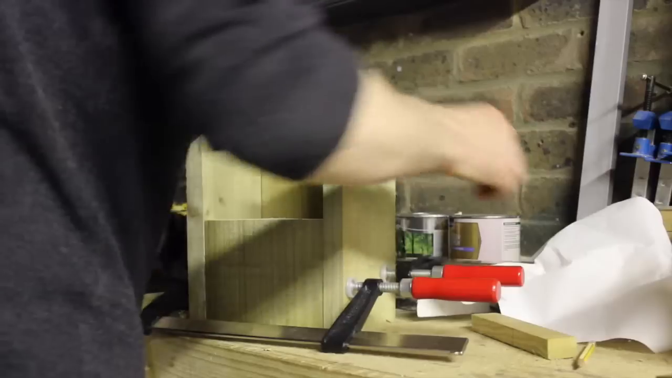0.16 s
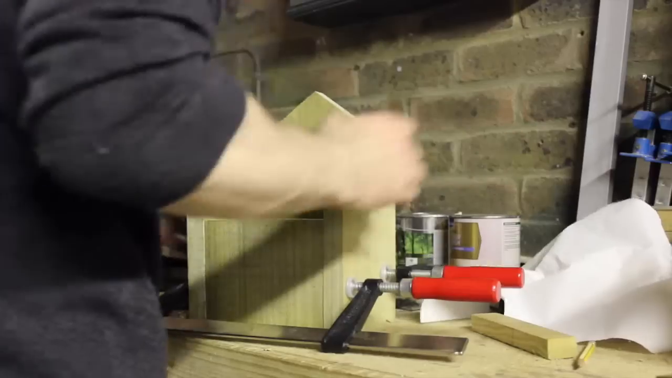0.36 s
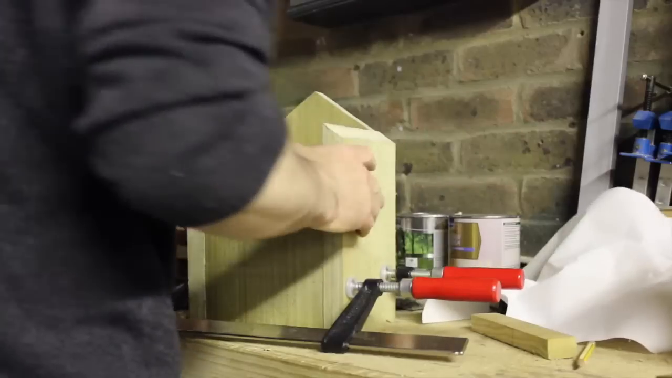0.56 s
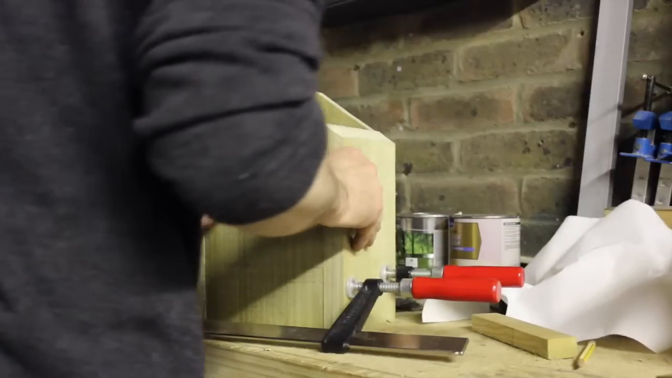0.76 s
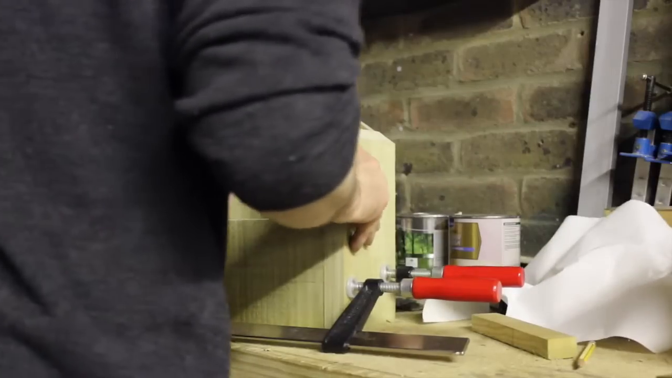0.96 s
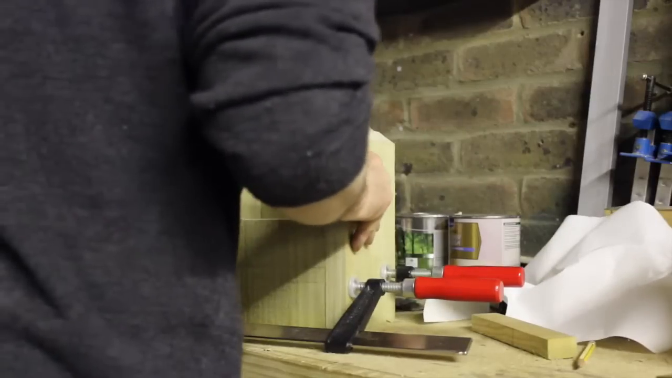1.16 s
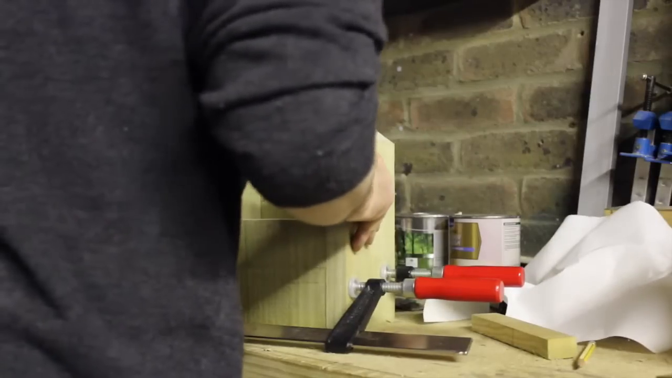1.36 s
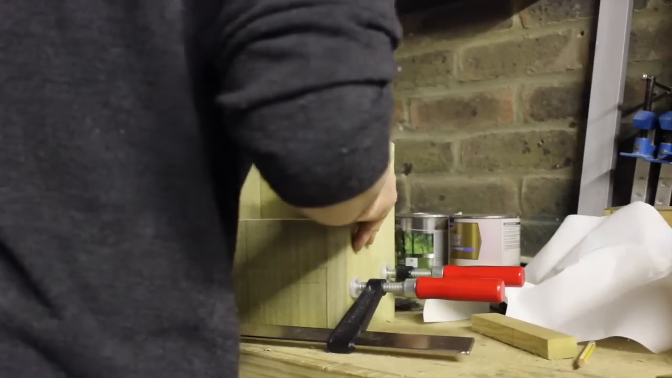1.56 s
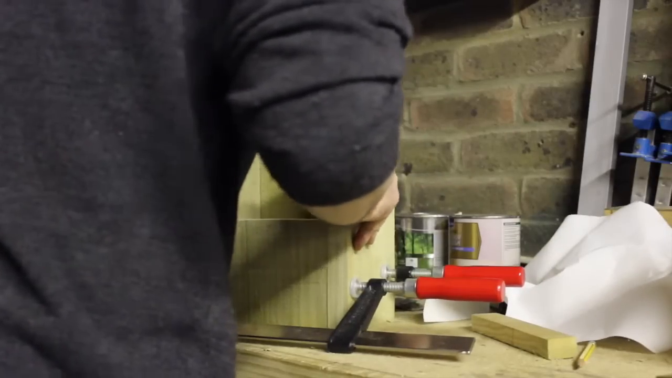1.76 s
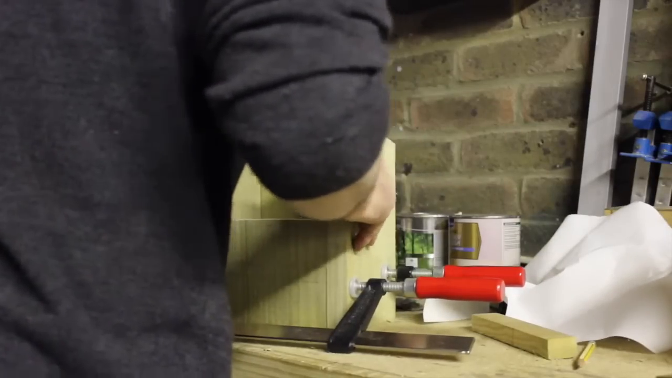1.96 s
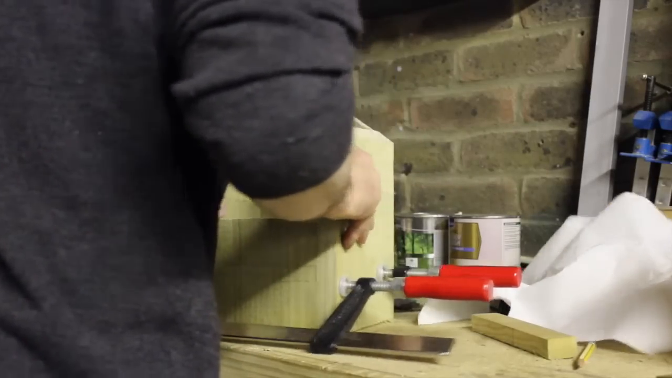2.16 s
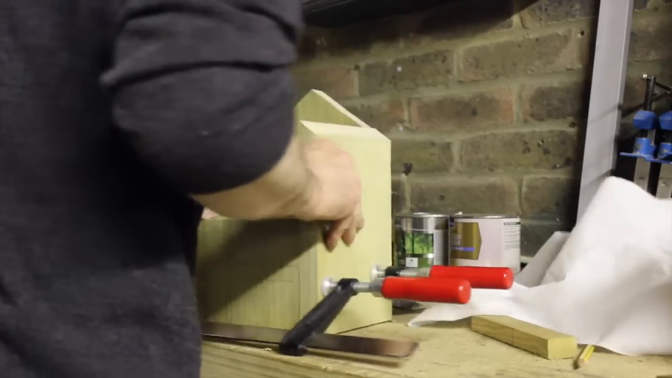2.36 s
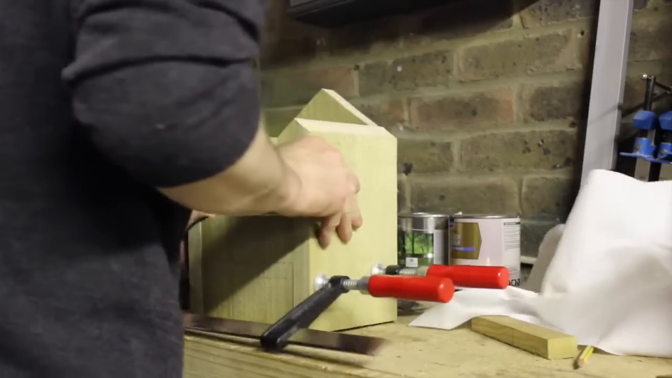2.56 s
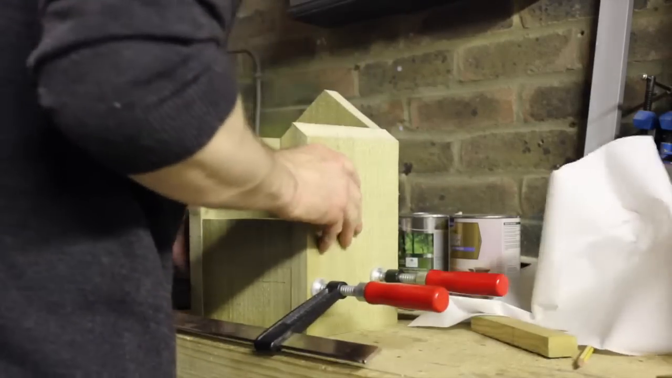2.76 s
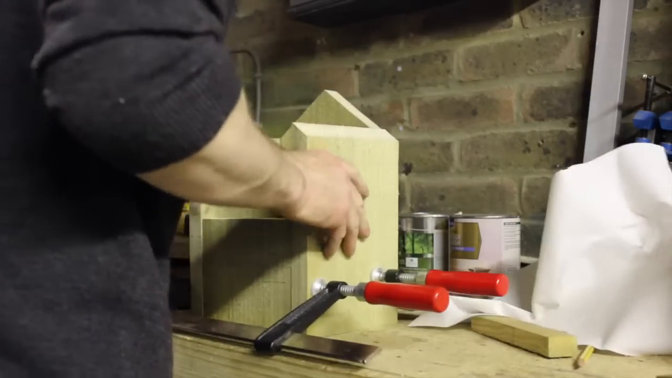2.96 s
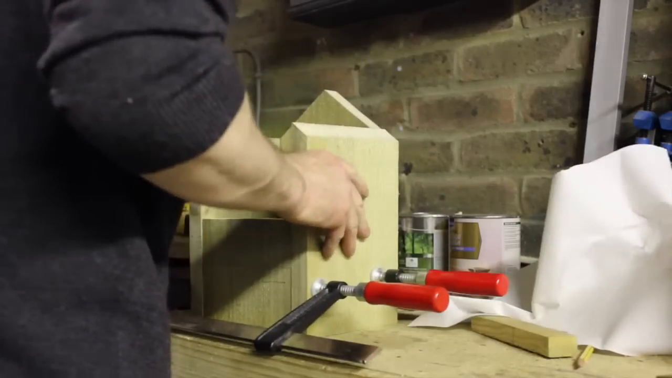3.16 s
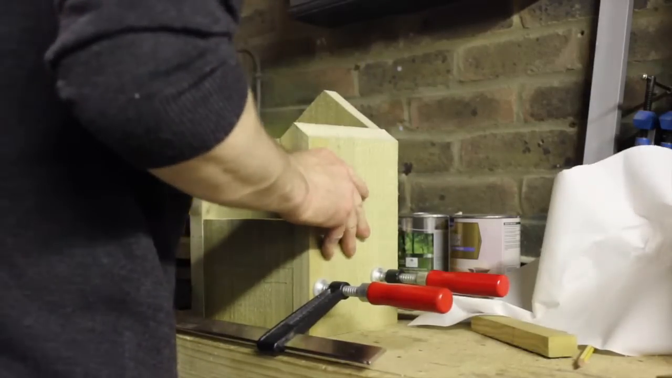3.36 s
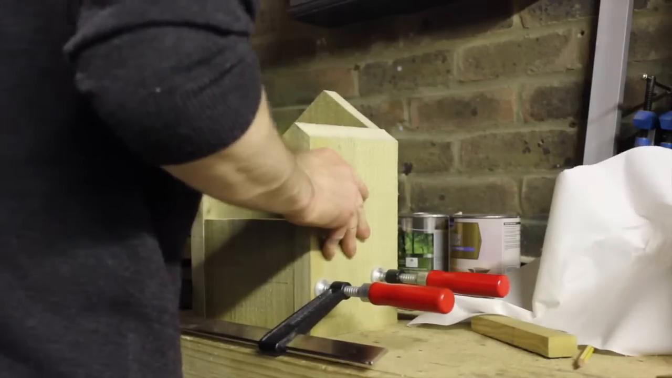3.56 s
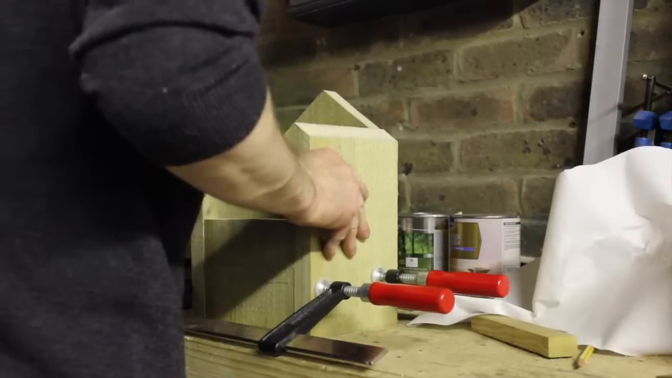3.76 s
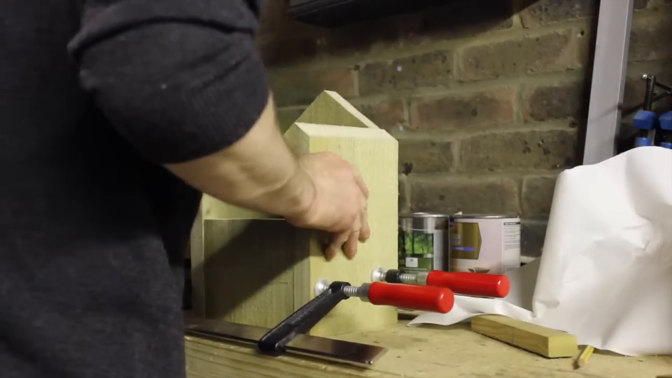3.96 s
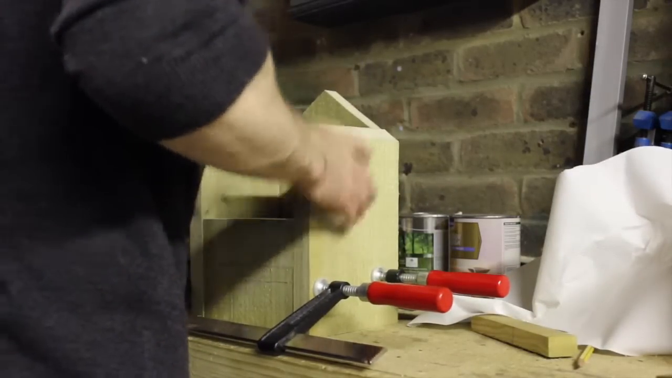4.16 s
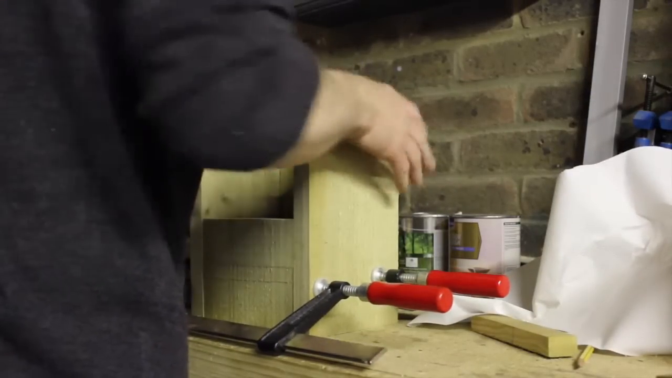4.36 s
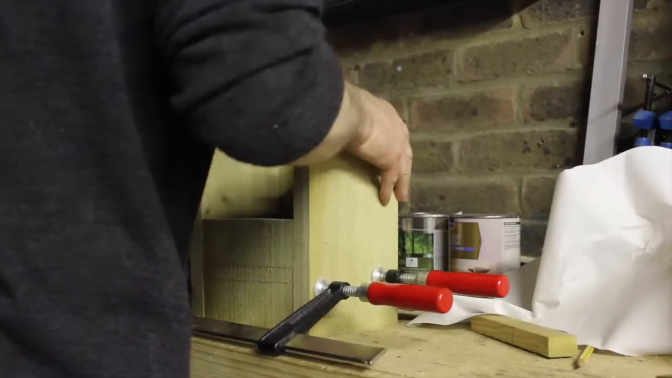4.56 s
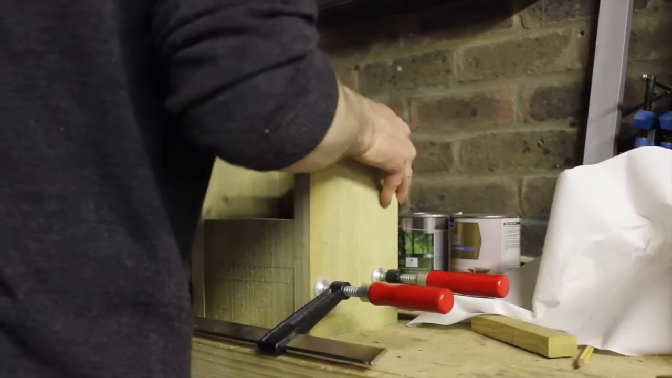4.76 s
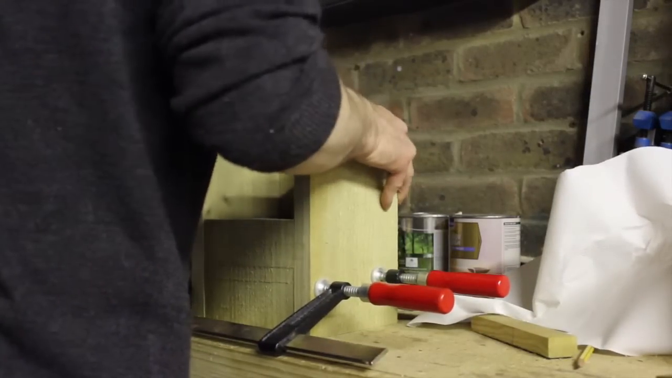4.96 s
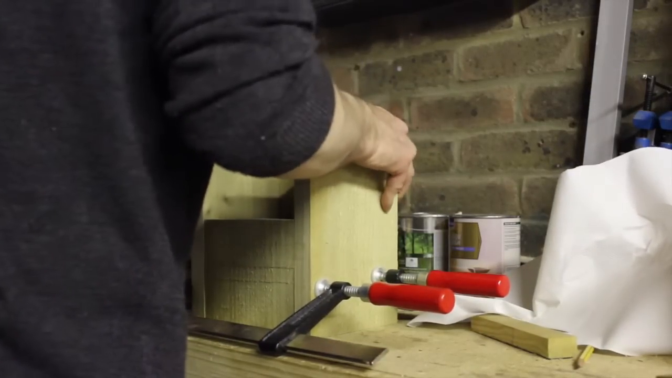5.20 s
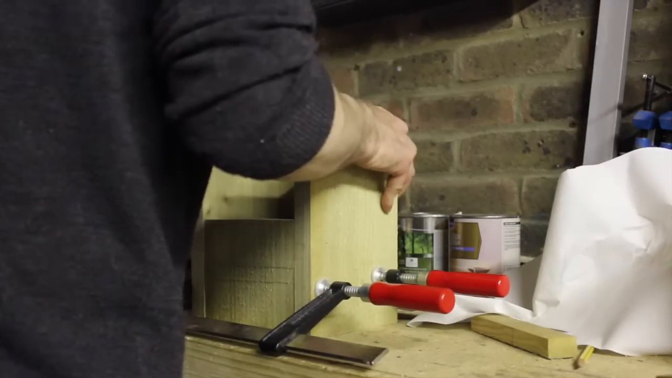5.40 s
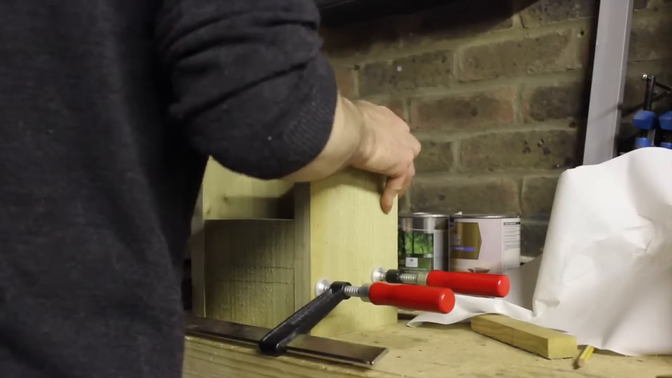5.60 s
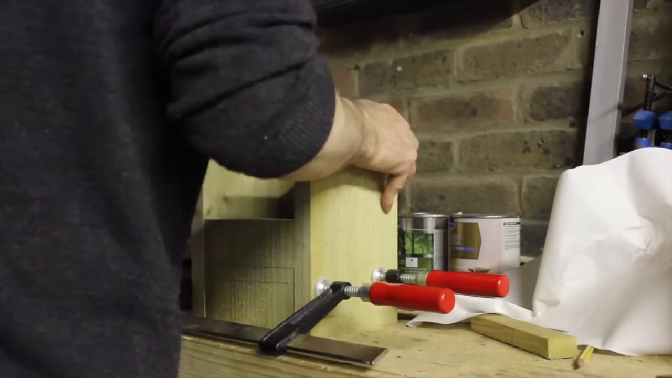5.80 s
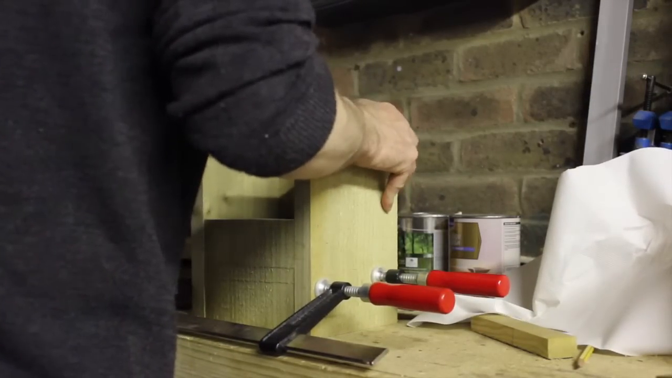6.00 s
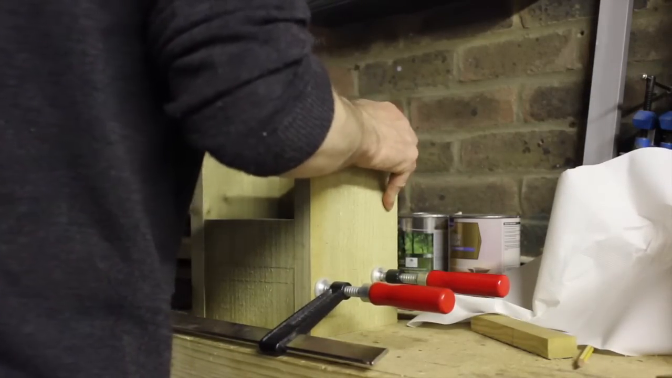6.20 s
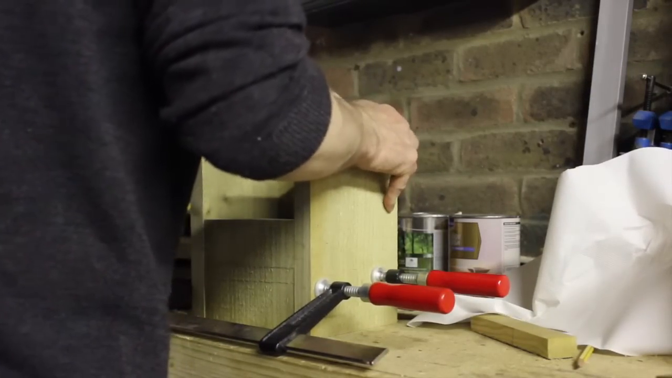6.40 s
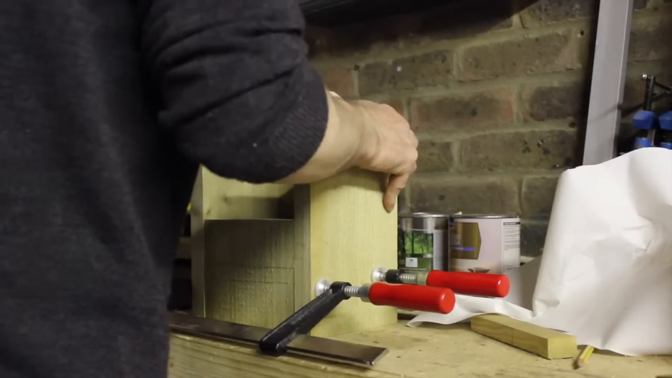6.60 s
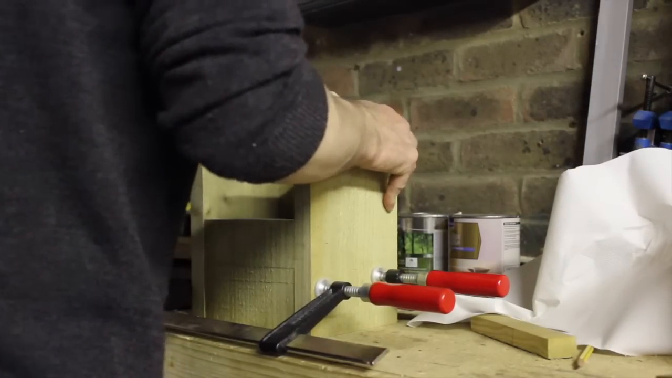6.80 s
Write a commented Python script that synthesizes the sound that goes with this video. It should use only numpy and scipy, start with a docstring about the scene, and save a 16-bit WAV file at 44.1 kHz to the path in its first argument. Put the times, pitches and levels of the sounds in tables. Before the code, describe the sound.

A wooden panel claps against a hollow box after a light brush of hands. The box scrapes and bumps across a wooden workbench, with a faint singing from its steel clamp bars, and lands with a loud hollow knock. Quiet sliding strokes and small finger taps follow. The space is a small workshop with little echo, and a low rumble and microphone hiss lie underneath.

```python
"""A wooden box with steel bar clamps is handled on a workbench in a small brick workshop.
Hands brush the wood, then a panel claps into place at 0.75 s. From 2.1 s the box is dragged round,
bumping and scraping, its clamp bars singing, and is set down with a knock at 2.84 s. Fingers then
rub and tap it to the end. Blows and friction ring the same hollow box and bench; a steady bed of
microphone hiss and room rumble lies under it all."""
import sys
import numpy as np
from scipy import signal
from scipy.fft import rfft, irfft, next_fast_len
from scipy.io import wavfile
from scipy.ndimage import map_coordinates

SR = 44100
rng = np.random.default_rng(int(sys.argv[2]) if len(sys.argv) > 2 else 0)


def store_wav(level_fs):
    """Save 16-bit WAV to argv[1]."""
    pcm = np.round(np.clip(np.atleast_2d(level_fs), -1, 1) * 32767)
    wavfile.write(sys.argv[1], SR, pcm.T.astype(np.int16))


N = 301644
RING_T = np.arange(SR // 2) / SR  # time axis of one hit, s

# Wood-on-wood hits: t/s, box level/dB, then bench, panel, tick level/dB re box, struck spot f/Hz
BLOW_CUES = [(0.043, -33, -30, -12, -27, 388), (0.748, -21.5, -5.5, 15, -3.5, 328),
             (0.76, -13.5, -15.5, -4.5, -38, 460), (0.821, -30.5, -21, -22, -45, 340),
             (2.283, -21.5, -28, -13, -29, 417), (2.401, -25.5, -7, -2.5, -15, 430),
             (2.491, -12.5, -22.5, -8.5, -73, 465), (2.515, -28, -31, 0.5, -17, 379),
             (2.534, -21.5, -18, -21, -35, 452), (2.777, -30.5, -21, -8, -15, 490),
             (2.842, -5, -8, -12.5, -36, 380), (2.866, -13, -7.5, -27, -45, 576),
             (2.889, -20.5, -10, -20, -37, 520), (4.87, -32.5, -17, -5.5, -10, 394)]
# Finger taps and nudges: t/s, box level/dB, then panel, tick level/dB re box
TAP_CUES = [(0.002, -45, -5, -24), (0.073, -47, 0, -21), (0.397, -61.5, 2, 12.5), (3.336, -40.5, -15, -20),
            (3.711, -41.5, -8, -35), (4.121, -47.5, -5, -8), (4.542, -53, -1, -4), (5.002, -47, 8, -26),
            (5.035, -46, 2, -16), (5.333, -45, -1, -16), (5.439, -52.5, 11.5, 0), (5.514, -43.5, 3.5, -9),
            (5.577, -44, -2, -13), (5.75, -45.5, -6, -7.5), (5.853, -51, 2, -1), (5.888, -49.5, -10, -7),
            (5.93, -45, -22, -12), (6.095, -34.5, -7.5, -17), (6.144, -33.5, -12, -20.5),
            (6.206, -40.5, -0.5, -12.5), (6.241, -53, 9.5, -4), (6.489, -46.5, 2.5, -14),
            (6.592, -47.5, 1.5, -14), (6.678, -59, 15.5, -23), (6.75, -52, 8.5, -4.5),
            (6.797, -48, 10.5, -7.5)]
def blows():
    """Each knock or tap rings box, bench and panels, with a contact tick for attack."""
    onset_delay_s, trim_db = 0.001544, 2.5  # short delay before every hit sounds; gain on every hit
    tap_bench_db, tap_spot_hz = -15.5, 420
    taps = [(s, db, tap_bench_db, panel, tick, tap_spot_hz) for s, db, panel, tick in TAP_CUES]
    out = np.zeros(N + SR)
    fizz = coloured(rng.standard_normal(N), FIZZ_EQ)
    for s, db, bench_db, panel_db, tick_db, spot_hz in BLOW_CUES + taps:
        at = round((s + onset_delay_s) * SR)
        hit = box_knock(spot_hz) + amp(bench_db) * bench_thud()
        hit += amp(panel_db) * panel_clap(hardness_db=tick_db - panel_db)
        hit += amp(tick_db) * contact_tick(np.roll(fizz, -at), db + tick_db)
        out[at:at + len(hit)] += amp(db + trim_db) * hit
    return out[:N]


# Hollow body of the box, its modes: f/Hz, level/dB, t60/s
BOX_MODES = [(362.4, -5.5, 0.26), (388.4, -3.5, 0.14), (421.8, 1.5, 0.12), (455, 5, 0.05), (536, -4, 0.11),
             (610, -7.5, 0.057), (716, -6, 0.077)]
def box_knock(spot_hz):
    """The hollow knock: the struck spot favours the modes near its own note."""
    modes = [(hz, db - 14 * abs(np.log2(hz / spot_hz)), t60) for hz, db, t60 in BOX_MODES]
    return echoing(ringing(modes, rise=0.00083, scatter_db=5), wet_db=-8, t60=0.17)


# Low end of the bench, its modes: f/Hz, level/dB, t60/s
BENCH_MODES = [(95, -22, 0.2), (145, -14, 0.22), (180.4, -10.5, 0.17), (213.7, -2.5, 0.12),
               (251, -1.5, 0.071), (269.8, 1.5, 0.11), (298, -7.5, 0.167)]
def bench_thud():
    """The bench takes the blow and adds a slower thud underneath."""
    return echoing(ringing(BENCH_MODES, rise=0.0044, scatter_db=5.5), wet_db=-10, t60=0.59)


# Short, bright modes of the panels: f/Hz, level/dB, t60/s
PANEL_MODES = [(823, -5, 0.043), (937, 7.5, 0.022), (1004, -5.5, 0.05), (1168, -8, 0.074),
               (1250, -4, 0.056), (1370, -1.5, 0.025), (1465, 10.5, 0.012), (1640, -14, 0.05),
               (1888, -2.5, 0.031), (2025, -4, 0.028), (2114, -9.5, 0.031), (2720, -12.5, .03),
               (3110, -3.5, 0.019), (3630, -13, 0.018)]
def panel_clap(hardness_db):
    """The panels clap: the softer the contact, the duller they ring."""
    clap = ringing(PANEL_MODES, rise=0.0012, scatter_db=2.5, tilt_db=0.19 * (hardness_db + 20.5))
    return echoing(clap, wet_db=0, t60=0.14)


# Top-end fizz of contact, for ticks and sliding hiss: f/Hz, level/dB
FIZZ_EQ = [(1760, -22), (3000, -4.5), (3420, -4.5), (6040, -10.5), (6610, -12), (15700, -28.5)]
def contact_tick(fizz, level_db):
    """A hard edge ticks; a loud slap lands on a broad face and loses its top end."""
    tick = fizz[:len(RING_T)] * amp(5.5 - 60 * RING_T / 0.039) * (1 - np.exp(-RING_T / 0.0011))
    cutoff_hz = np.clip(15000 * amp(-0.3 * (level_db + 50.5)), 3000, 20000)
    tick = signal.sosfilt(signal.butter(2, cutoff_hz, fs=SR, output="sos"), tick)
    return echoing(tick, wet_db=-3.5, t60=0.13)


# Dry rasp of sliding on wood: f/Hz, level/dB
RASP_EQ = [(290, -43), (500, -5), (674, -3.5), (795, -13.5), (918, -5), (2100, -4), (7000, -26.5),
           (9100, -44), (15400, -120)]
def rubbing():
    """Wood, skin and steel slide on wood: the grit shakes box and bench, rasps and hisses."""
    rasp_db, rumble_db, hiss_db = slide_levels()
    shake = grit(rate=75, lumpy_db=2.5)
    body = ringing(BOX_MODES, rise=0.0039) + amp(-3.5) * ringing(BENCH_MODES, rise=0.0014)
    rumble = unit(signal.fftconvolve(shake, body)[:N])
    scratch = grit(rate=120, lumpy_db=1.5)
    # the bars sing when the whole box moves, so they fade in with the rasp level
    bar_mix = 0.64 * np.clip((rasp_db + 56) / 18, 0, 1)
    rasp = np.sqrt(1 - bar_mix ** 2) * coloured(scratch, RASP_EQ) + bar_mix * clamp_bars(scratch)
    hiss = coloured(grit(rate=230, lumpy_db=1.5), FIZZ_EQ)
    return amp(rumble_db) * rumble + amp(rasp_db) * rasp + amp(hiss_db) * hiss


# Fader moves of the box drag: t/s, rasp level/dB, rumble level/dB, hiss level/dB
DRAG_FADERS = [(2.1, -75, -75, -80), (2.16, -50, -59, -59), (2.224, -38.5, -34.5, -43),
               (2.294, -32, -32, -35), (2.348, -31, -28.5, -40), (2.475, -38, -41.5, -43.5),
               (2.56, -41, -36.5, -48.5), (2.648, -35.5, -35, -49.5), (2.684, -46, -45.5, -58),
               (2.744, -44, -40.5, -55.5), (2.774, -40.5, -49.5, -43), (2.837, -41.5, -32, -41),
               (2.87, -75, -47, -75)]
# Hands and loose pieces slide: peak t/s, rise/s, fall/s, rasp level/dB, weight (rumble re rasp)/dB
STROKE_CUES = [(0.401, 0.06, 0.78, -47, -11), (0.73, 0.15, 0.099, -42, -10), (1.14, 0.1, 0.15, -52, -1.5),
               (1.218, 0.079, 0.028, -53.5, -7), (1.58, 0.099, 0.095, -57, 1),
               (1.862, 0.22, 0.55, -61, 4.5), (3.02, 0.13, 0.37, -59.5, 11), (3.086, 0.45, 0.1, -57, -14),
               (3.377, 0.24, 0.11, -49, 0.5), (3.632, 0.45, 0.13, -54.5, 4), (4.144, 0.19, 0.12, -53, -1.5),
               (4.24, 0.12, .07, -50, -0.5), (4.55, 0.042, 0.12, -49, -0.5),
               (4.61, 0.069, 0.15, -48.5, -1.5), (4.798, 0.16, 0.25, -56, 0.5),
               (4.874, 0.033, 0.078, -46, 1.5), (5.034, 0.17, 0.13, -48, -2), (5.17, .05, 0.23, -58, 5),
               (5.25, 0.13, 0.068, -52.5, -7), (5.42, 0.31, 0.23, -55, -4), (5.531, 0.067, 0.52, -53, -1),
               (5.86, 0.33, .12, -54.5, 2), (5.965, .06, 0.11, -56.5, 10.5), (6.25, .1, 0.093, -56, 2.5),
               (6.33, 0.045, 0.14, -63.5, 6), (6.496, 0.033, 0.079, -59, 5),
               (6.63, 0.066, 0.091, -66, 12.5)]
def slide_levels():
    """Rasp, rumble and hiss envelopes in dB: drag, resting hands and strokes add in power."""
    resting_db, hiss_db, fade_db = -66, -7.5, 24  # still hands; hiss re rasp; drop per rise or fall
    t = np.arange(N) / SR
    times, *faders = np.transpose(DRAG_FADERS)
    power = np.array([amp(2 * np.interp(t, times, fader, -120, -120)) for fader in faders])
    power += amp(2 * (resting_db + np.vstack([0, 0, hiss_db])))
    for peak, rise, fall, db, weight_db in STROKE_CUES:
        swell_db = db - fade_db * np.where(t < peak, (peak - t) / rise, (t - peak) / fall)
        balance_db = np.vstack([0, weight_db, hiss_db - 0.33 * weight_db])  # heavy strokes hiss less
        power += amp(2 * (swell_db + balance_db))
    return 10 * np.log10(power)


# Resonances of the sliding steel bars: f/Hz, width/Hz, level/dB
BAR_MODES = [(815, 14, 0.5), (1296, 9.8, 7.5), (1460, 29, -10), (2060, 19, 2.5), (2108, 38, -7.5),
             (2460, 53, -8), (2670, 50, -13.5), (3420, 13, -13)]
def clamp_bars(scratch):
    """Friction sings through the clamp bars: narrow resonances of alternating polarity."""
    def response(f):
        return sum((-1) ** k * amp(db) * 1j * f * width / (hz * hz - f * f + 1j * f * width)
                   for k, (hz, width, db) in enumerate(BAR_MODES))
    return unit(filtered(scratch, response))


def grit(rate, lumpy_db):
    """Friction force: noise whose strength jumps as the grain catches, rate times a second."""
    catches = rng.standard_normal(int(N * rate / SR) + 4)
    return rng.standard_normal(N) * amp(lumpy_db * map_coordinates(catches, [np.arange(N) * rate / SR]))


def ringing(modes, rise, scatter_db=0, tilt_db=0):
    """A body rings after a push of rise seconds, at peak 1; tilt_db is brightness per octave."""
    low_hz, ring = modes[0][0], 0
    for hz, db, t60 in modes:
        db += scatter_db * rng.standard_normal()  # where it is struck varies the balance
        db += tilt_db * np.log2(hz / low_hz)
        ring += amp(db - 60 * RING_T / t60) * np.sin(2 * np.pi * hz * RING_T)
    ring *= 1 - np.exp(-RING_T / rise)
    # below its lowest mode a body hardly radiates
    ring = signal.sosfilt(signal.butter(2, 0.82 * low_hz, "high", fs=SR, output="sos"), ring)
    return ring / np.abs(ring).max()


def echoing(hit, wet_db, t60):
    """A hit plus its own short tail of reflections off bench and walls."""
    tail = rng.standard_normal(len(RING_T)) * amp(-60 * RING_T / t60) * (1 - np.exp(-RING_T / 0.0016))
    return hit + signal.fftconvolve(hit, amp(wet_db) * tail / np.linalg.norm(tail))[:len(hit)]


# Tone of the background bed: f/Hz, level/dB
BED_EQ = [(12, -24), (20, -6.5), (33, -24), (59, -5.5), (113, -9.5), (254, -9), (356, -8.5), (470, -8.5),
          (605, -10.5), (715, -11), (1560, -14.5), (3620, -17), (15900, -25)]
def noise_bed():
    """Steady room rumble and microphone hiss."""
    return amp(-55.5) * coloured(rng.standard_normal(N), BED_EQ)


def coloured(x, eq):
    """x through an EQ curve drawn on a log frequency axis, at rms 1."""
    f, db = np.transpose(eq)
    return unit(filtered(x, lambda hz: amp(np.interp(np.log(hz + 1), np.log(f + 1), db))))


def filtered(x, response):
    """x through a complex frequency response."""
    size = next_fast_len(N + SR)
    return irfft(rfft(x, size) * response(np.fft.rfftfreq(size, 1 / SR)), size)[:N]


def amp(db):
    """Gain of a level in dB."""
    return 10 ** (np.asarray(db) / 20)


def unit(x):
    """x at rms 1."""
    return x / np.sqrt(np.mean(x ** 2) + 1e-20)


def scene():
    """Hits and friction, mixed in mono."""
    return (blows() + rubbing())[None]


def record(dry):
    """Lay in the bed, cut the very top and add a small DC offset."""
    top_hz, offset = 15780, 0.001
    return filtered(dry[0] + noise_bed(), lambda hz: hz < top_hz)[None] + offset


dry = scene()
out = record(dry)
store_wav(out)
```